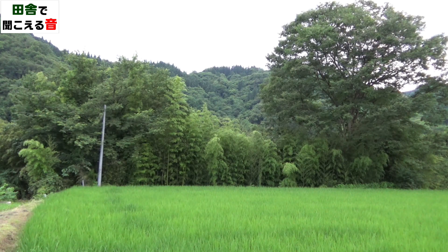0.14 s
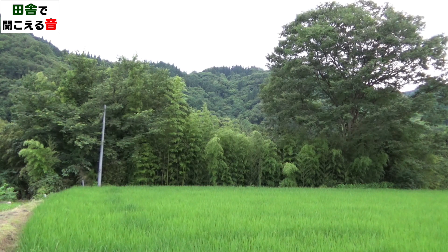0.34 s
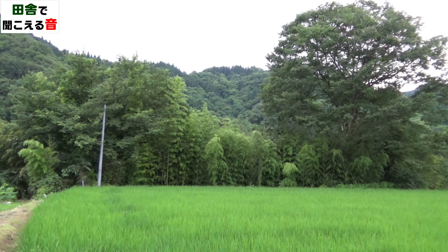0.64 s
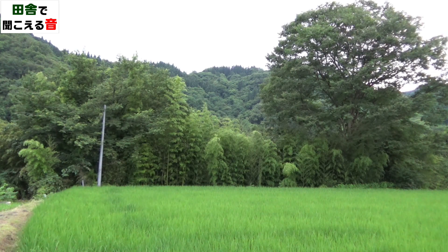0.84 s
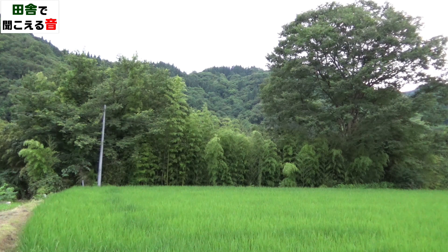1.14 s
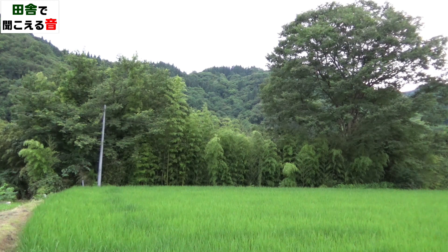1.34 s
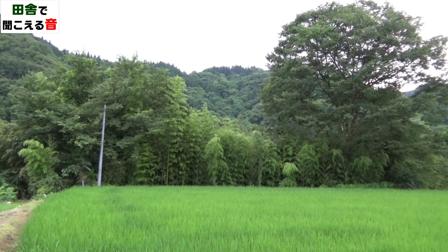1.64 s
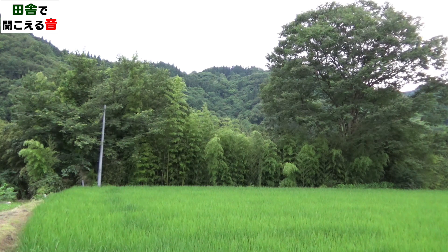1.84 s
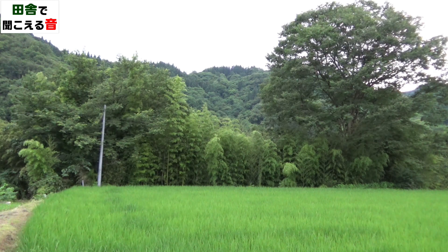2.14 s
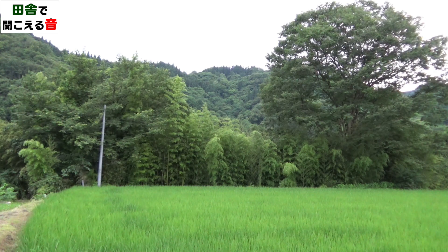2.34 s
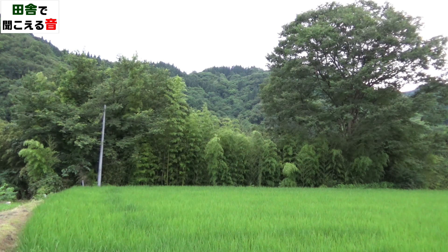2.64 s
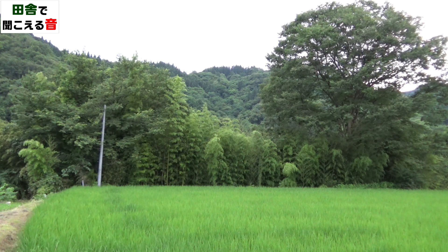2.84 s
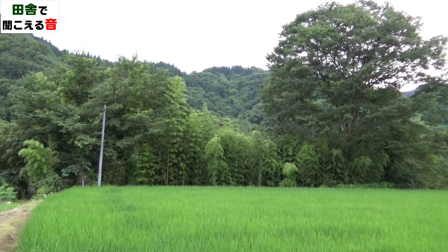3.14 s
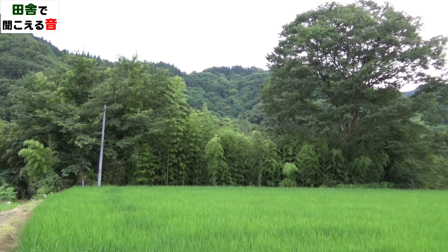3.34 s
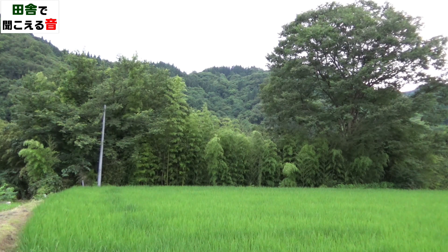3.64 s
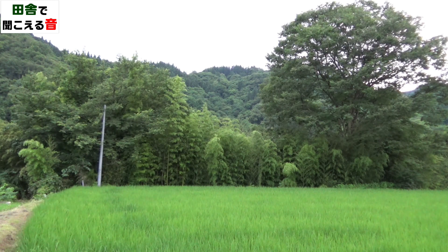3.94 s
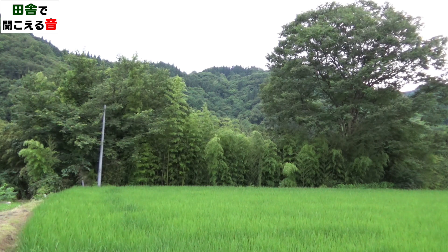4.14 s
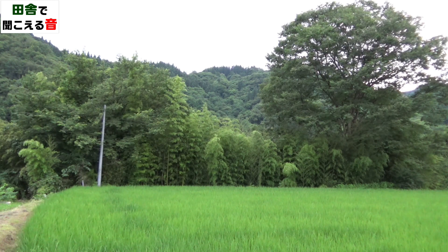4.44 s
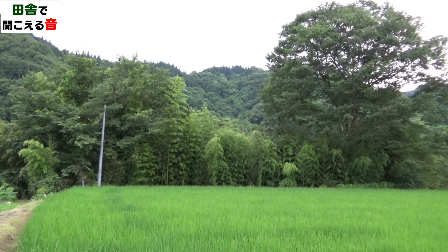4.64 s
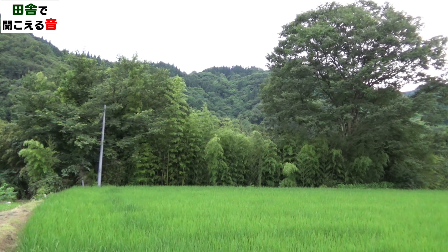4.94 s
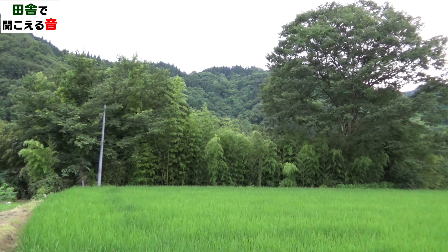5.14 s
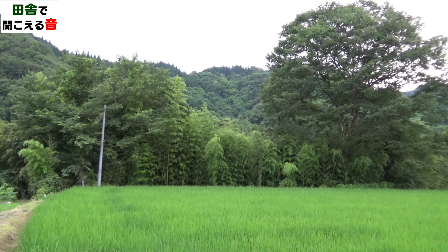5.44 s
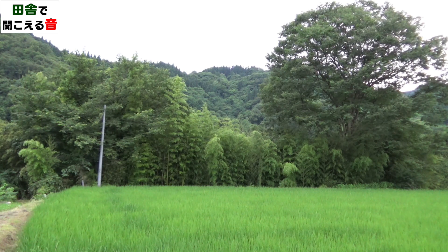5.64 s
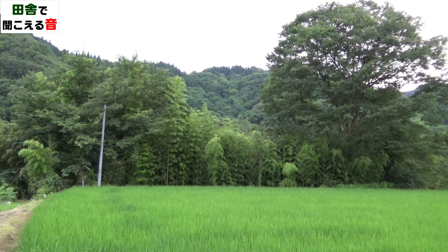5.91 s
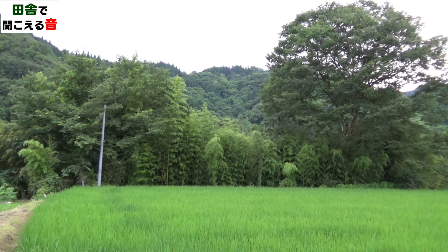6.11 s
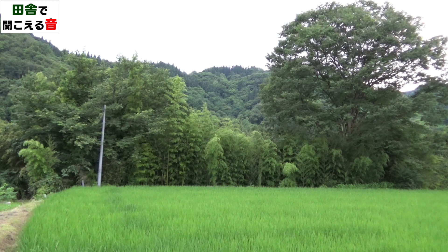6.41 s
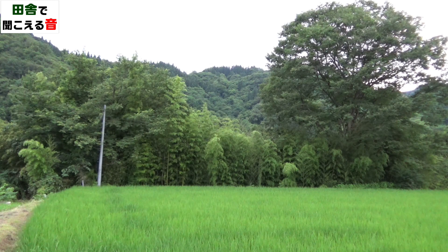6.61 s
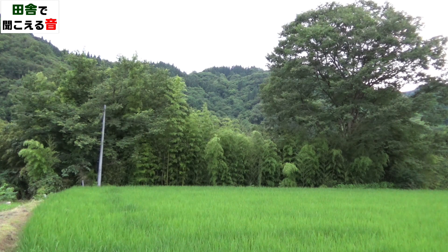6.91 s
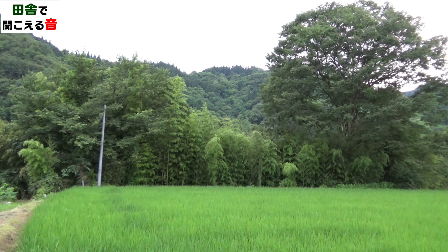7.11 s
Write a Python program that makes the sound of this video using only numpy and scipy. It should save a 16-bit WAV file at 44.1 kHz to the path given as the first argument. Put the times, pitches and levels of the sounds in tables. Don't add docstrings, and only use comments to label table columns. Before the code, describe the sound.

Outdoors beside rice fields and a wooded hill, a steady bright cicada drone fills the air. One evening caller finishes at about one second, then nearby singers enter one after another with quick, ringing, high syllables, about seven a second each, overlapping until the end. A fluttering buzzer runs throughout. The calls lean left with soft tree echoes; a few dull bumps touch the microphone.

```python
import sys
import numpy as np
from scipy import signal
from scipy.io import wavfile
from scipy.ndimage import uniform_filter1d

SR = 44100
rng = np.random.default_rng(int(sys.argv[2]) if len(sys.argv) > 2 else 0)


def natural_amplitude(level_db):
    exponent = np.asarray(level_db, float) / 20
    return 10 ** exponent


def bounce(signal):
    frames = np.transpose(np.atleast_2d(signal))
    limited = np.clip(frames, -1, 1)
    pcm = np.round(limited * 32767).astype(np.int16)
    wavfile.write(sys.argv[1], SR, pcm)


N = 320607
T = np.arange(N) / SR


def evened(x):
    return x / np.sqrt(np.mean(x ** 2) + 1e-20)


def read(points, hz):
    f, value = np.transpose(points)
    return np.interp(np.log(hz + 1), np.log(f + 1), value)


def curve(rows):
    return np.interp(T, *np.transpose(rows))


def phase(hz):
    return 2 * np.pi * np.cumsum(hz) / SR


def resonate(x, hz, width_hz):
    b, a = signal.iirpeak(hz, hz / width_hz, SR)
    return evened(signal.sosfilt([[*b, *a]] * 2, x))


def drift(per_s):
    knots_per_s = 400
    knots = np.arange(0, 8, 1 / knots_per_s)
    rough = rng.standard_normal(len(knots))
    smooth = signal.lfilter([1], [1, -np.exp(-2 * np.pi * per_s / knots_per_s)], rough)
    return np.interp(T, knots, evened(smooth))


def placed(x, pan_db):
    return x * natural_amplitude([[pan_db / 2], [-pan_db / 2]])


def spread(x, colour, patchy_db, ridged_db):
    # f/Hz, likeness/0-1
    likeness = [(60, 0.61), (130, 0.88), (290, 0.89), (640, 0.45), (1410, 0.44), (3100, 0.57), (6820, 0.48),
                (9300, 0.67), (10200, 0.96)]
    # f/Hz, left over right/dB
    balance = [(60, 0), (550, 0.5), (1650, -1.5), (4970, 2), (8500, 2), (10200, 1.5)]
    hz, _, z = signal.stft(x, SR, nperseg=1024, noverlap=512)
    chance = rng.standard_normal(z.shape)
    patches = evened(uniform_filter1d(uniform_filter1d(chance[0], 10, 0), 7, 1))
    ridges = evened(uniform_filter1d(chance[1], 90, 1))
    same = np.clip(read(likeness, hz), -1, 1)[:, None]
    lean_db = read(balance, hz)[:, None]
    left = z[0] * natural_amplitude(lean_db / 2)
    right = (same * z[0] + np.sqrt(1 - same ** 2) * z[1]) / natural_amplitude(lean_db / 2)
    gain_db = read(colour, hz)[:, None] + patchy_db * patches + ridged_db * ridges
    z = np.array([left, right]) * natural_amplitude(gain_db)
    return evened(signal.istft(z, SR, nperseg=1024, noverlap=512)[1][:, :N])


def clicks(hz, wander):
    turns = np.cumsum(hz * (1 + wander * drift(3))) / SR
    return evened(np.diff(np.floor(turns), prepend=0))


def still_air():
    # f/Hz, density/dB per Hz
    air = [(20, -34), (100, -27.5), (160, -25), (250, -11.5), (450, -12), (1000, -11.5), (1500, -15),
           (1750, -8), (2000, 0.5), (2180, 1), (2260, -8.5), (3100, -19.5), (3400, -16.5), (4600, -37.5)]
    return natural_amplitude(-37.6) * spread(rng.standard_normal((2, N)), air, 0.91, 1.0)


def pump():
    # f/Hz, level/dB, width/Hz
    hum = [(530.6, -55, 5.08), (823, -61, 3.6)]
    on = np.clip(.72 + 2.2 * np.cos(2 * np.pi * (5.15 * T - .14)), 0, 1)
    turn = phase(305.5 + 1.656 * drift(4))
    out = natural_amplitude(-46) * on * np.sin(turn) + natural_amplitude(-55.5) * (1 - on) * np.sin(2 * turn)
    for hz, db, width_hz in hum:
        tone = np.sin(phase(hz + width_hz * drift(6.1) / 2))
        out += natural_amplitude(db + 6) * tone * (1 + 0.17 * drift(18))
    return out


def knocks():
    # t/s, peak level/dB, f/Hz, t60/s, rustle level/dB
    bumps = [
        (0.59, -32, 325, 0.059, -13),
        (2.459, -36, 229, 0.061, -6),
        (4.169, -37.5, 474, 0.077, -9),
        (5.47, -44, 920, .2, -20),
        (6.833, -29.5, 232.7, 0.085, -9.5),
    ]
    out, t = np.zeros(N), np.arange(SR // 3) / SR
    for s, db, hz, t60, rustle_db in bumps:
        rustle = resonate(rng.standard_normal(len(t)), 410, 900)
        rustle *= natural_amplitude(rustle_db - 60 * t / .5) * np.minimum(t / 0.022, 1)
        thud = natural_amplitude(-60 * t / t60) * np.sin(2 * np.pi * hz * t) * np.minimum(t / 0.0047, 1)
        out[round(s * SR):][:len(t)] += natural_amplitude(db) * (thud + rustle)
    return out


def far_chorus():
    # t/s, level/dB
    joining = [(0, -42.5), (2, -43), (2.6, -38.5), (3.7, -36.5), (4.6, -38.5), (7.27, -37.8)]
    # f/Hz, level/dB
    haze = [(1500, -37.5), (1750, -15.5), (2080, -1), (2190, -17), (2280, -26.5), (3150, -21), (3650, -3),
            (3800, -1), (4200, 3), (4500, -14), (5500, -60)]
    crowd = rng.standard_normal((2, N))
    for k, (pitch, pace, start) in enumerate(rng.random((8, 3))):
        on = np.clip(1.65 * np.cos(2 * np.pi * (T * (6 + 1.4 * pace) + start)), 0, 1)
        turn = phase(3550 + 500 * pitch + 30 * drift(29.7))
        crowd[k % 2] += 0.15 * on * (np.sin(turn) + np.sin(turn / 2))
    return natural_amplitude(curve(joining) + 7) * spread(crowd, haze, 0.63, 0.7)


def drone():
    # f/Hz, density/dB per Hz
    colour = [(3000, -57), (4400, -9.5), (5100, -10), (5650, -9.5), (5800, -3.5), (6500, -6), (7600, 0),
              (8830, -4.5), (9300, -10), (9700, -14), (11000, -17), (13200, -18), (14300, -33),
              (15200, -48)]
    # t/s, level/dB
    fader = [(0, -29), (1.2, -28), (7.27, -27.5)]
    # f/Hz, level/dB
    lines = [(5798, -62), (6083, -48), (6412, -56), (7025, -43), (7321, -40), (7397, -49), (7752, -52),
             (8592, -44), (8780, -74), (8990, -45)]
    crowd = rng.standard_normal((2, N))
    for k, pace in enumerate(rng.random(6)):
        crowd[k % 2] += 0.33 * clicks(250 + 170 * pace, .0012)
    out = natural_amplitude(curve(fader) + 1.5) * spread(crowd, colour, 0.89, 2.8)
    noise = rng.standard_normal(N)
    for hz, db in lines:
        line = placed(resonate(noise, hz, 15), 4 * rng.standard_normal())
        out += line * natural_amplitude(db - 4.0 + 0.5 * drift(.6))
    end_s, every_s, stop_s = 1.117, 1.147, 0.06
    top_db, range_db = -35, 14
    swell = uniform_filter1d((T - end_s) / every_s % 1, round(stop_s * SR))
    sweller = natural_amplitude(top_db + range_db * (swell - 1)) * resonate(noise, 6490, 240)
    return out + placed(sweller, 2.1)


def buzzer():
    # t/s, lead over the steady stroke/turns, depth change/dB
    pumping = [(0, -0.39, -1.5), (1, -0.37, -0.5), (2, -0.29, 0), (3, -0.46, 1.5), (4, -0.51, 1.5),
               (5, -0.42, 2), (6, -.45, 1), (7.27, -0.41, 1.5)]
    # f/Hz, width/Hz, level/dB, loudest part of stroke/0-1, depth/dB, split in two/0-1
    belly = [(4660, 44, -48, .9, 26, 0.03), (4820, 66, -44.5, 0.01, 14, 0), (5730, 50, -47, 0, 18, 0),
             (5440, 54, -44, 0, 21, 0.05), (10820, 150, -49.5, 0.98, 14, 0),
             (11320, 150, -48, 0.1, 14, 0.2), (12400, 170, -50, 0.53, 13, .7),
             (12600, 200, -51, .35, 13, .6), (12950, 250, -56, 0.35, 11, .7),
             (13690, 350, -48, .45, 16, .6), (14010, 220, -48.5, .45, 8, .5),
             (14500, 230, -49.5, 0.4, 14, .5), (15000, 260, -51, 0.55, 12, .5),
             (15400, 270, -49, .47, 28, 0.2), (15680, 200, -56, .47, 30, .3)]
    s, lead, change_db = np.transpose(pumping)
    stroke = 9.4 * T + np.interp(T, s, lead)
    change_db = np.interp(T, s, change_db)
    drive = clicks(150.8, .0003) + 0.4 * rng.standard_normal(N)
    out = np.zeros((2, N))
    for hz, width_hz, db, part, depth_db, split in belly:
        swing = np.cos(2 * np.pi * (stroke - part))
        swing = swing - split * (2 * swing ** 2 - 1)
        level_db = db + 2 + change_db + (depth_db + 2 * change_db) * (swing - 1) / 2
        out += placed(natural_amplitude(level_db) * resonate(drive, hz, width_hz), 13.0 * (hz < 9000))
    return out


def hillside(x, t60):
    t = np.arange(SR // 2) / SR
    sparse = rng.standard_normal((2, len(t))) * (rng.random((2, len(t))) < .05)
    taps = sparse * natural_amplitude(-60 * t / t60) * (t > .012)
    return signal.fftconvolve(x[None], taps / np.linalg.norm(taps[0]), axes=1)[:, :N]


def syllables(turns, pace_s):
    number = np.cumsum(np.round(np.diff(np.transpose(turns)[0], prepend=turns[0][0]) / pace_s))
    count = np.arange(number[-1] + 1)
    s, length, hz, db, half_db = (np.interp(count, number, v) for v in np.transpose(turns))
    chance = rng.standard_normal((len(s), 2)).T
    length = length * (1 + 0.043 * chance[0])
    db = db + 0.77 * chance[1]
    return np.transpose([s, length, hz, db]), np.interp(T, s, half_db)


def singer(rows, half_db, upper_db, held_db, sides):
    s, length, hz, db = np.transpose(rows)
    nearest = np.searchsorted((s[1:] + s[:-1]) / 2, T)
    rise = (length[nearest] / 2 + T - s[nearest]) / .022 + .45
    fall = (length[nearest] / 2 - T + s[nearest]) / .009 + .4
    turn = phase(np.interp(T, s, hz) + 5.596 * drift(24.0))
    tone = np.sin(turn) + natural_amplitude(half_db) * np.sin(turn / 2)
    tone += natural_amplitude(upper_db) * (np.sin(turn * 3 / 2) + 0.88 * np.sin(2 * turn))
    for off_hz, side_db in sides:
        tone += natural_amplitude(side_db) * np.sin(turn + 2 * np.pi * off_hz * T + 1.15 * drift(26))
    shape = np.sin(np.clip(np.minimum(rise, fall), 0, 1) * np.pi / 2) ** 2
    held = natural_amplitude(np.interp(T, s, db) + held_db) * (T > s[0]) * (T < s[-1])
    level = natural_amplitude(db[nearest]) * shape + held * (1 - shape)
    return np.sqrt(2) * level * tone * (1 + 0.096 * drift(47))


def near_singers():
    # middle t/s, length/s, f/Hz, level/dB, half-pitch level/dB
    lead = [(1.337, 0.019, 4196, -24.5, -17), (1.616, 0.028, 4293, -20, -16.5),
            (2.026, 0.059, 4362, -25, -9), (2.423, 0.045, 4317, -23, -12), (3.11, 0.041, 4287, -21.5, -17),
            (4.077, 0.04, 4274, -19.5, -19), (5.066, .043, 4262, -21, -14),
            (6.204, .04, 4252, -22.5, -16.5), (7.228, 0.048, 4223, -27, -13)]
    second = [(2.872, 0.04, 4039, -23, -17), (3.025, .024, 4080, -28, -9),
              (3.148, 0.034, 4097, -26.5, -9.5), (3.715, 0.036, 4081, -28, -6),
              (3.895, 0.052, 4072, -27.5, -7.5), (4.042, 0.03, 4050, -25.5, -9),
              (4.776, .041, 4048, -23, -13), (5.685, .045, 4050, -22.5, -16),
              (7.218, 0.054, 4039, -24.5, -16.5)]
    third = [(2.053, 0.073, 3687, -41, -10), (2.393, .04, 3770, -34, -10), (2.79, 0.046, 3808, -31.5, -8.5),
             (3.45, .052, 3802, -30, -15), (3.998, 0.062, 3790, -32, -19), (4.385, 0.05, 3777, -31, -21),
             (5.465, 0.058, 3770, -33, -19), (6.011, 0.063, 3757, -35, -14),
             (7.15, 0.074, 3722, -37.5, -10.5)]
    fading = [
        (0.088, .052, 3866, -32.5, -5.5),
        (.858, 0.027, 3863, -30, -10.5),
        (1.082, 0.045, 3875, -30, -10),
    ]
    paces = [.14, .148, .13, .16]
    # offset/Hz, level/dB
    side_tones = [
        [(-130, -15), (309.5, -22.5)],
        [(-150, -30), (-300, -20.5), (-250, -10.5)],
        [(-85, -14), (-230, -11)],
        [(-165, -13), (-320, -9)],
    ]
    # pan/dB, overtones/dB, held between syllables/dB, echo/dB, echo delay/s, tail/dB
    voices = [
        (5.5, -20, -24, -16.5, 0.038, -13.5),
        (9, -12, -15, -7, .056, -14.5),
        (6.5, -13.5, -14.5, -9.5, 0.053, -13),
        (3, -26, -25, -13, .06, -7),
    ]
    out, far = np.zeros((2, N)), np.zeros(N)
    for turns, pace_s, sides, voicing in zip([lead, second, third, fading], paces, side_tones, voices):
        pan_db, upper_db, held_db, echo_db, echo_s, tail_db = voicing
        voice = singer(*syllables(turns, pace_s), upper_db, held_db, sides)
        late = np.roll(voice, round(echo_s * SR)) * (T > echo_s)
        out += placed(voice + natural_amplitude(echo_db) * late, pan_db) / np.mean(natural_amplitude([pan_db / 2, -pan_db / 2]))
        far += natural_amplitude(tail_db) * voice
    return out + hillside(far, t60=0.25)


def scene():
    return still_air() + pump() + knocks() + far_chorus() + drone() + buzzer() + near_singers()


def band_limit(x):
    return signal.sosfilt(signal.butter(12, 15780, fs=SR, output="sos"), x)


def record(dry):
    return band_limit(dry)


dry = scene()
out = record(dry)
bounce(out)
```